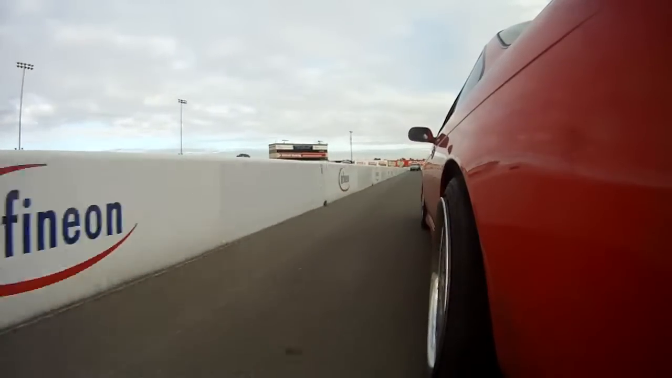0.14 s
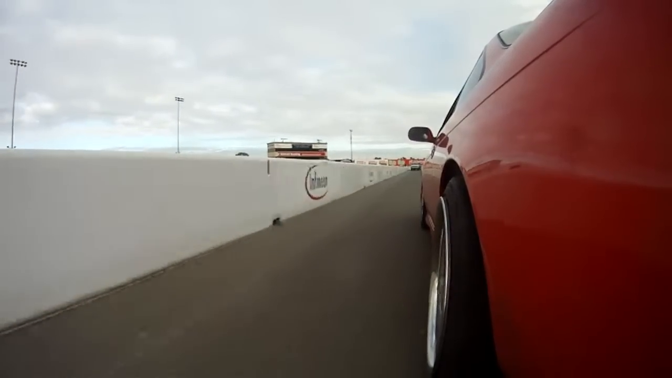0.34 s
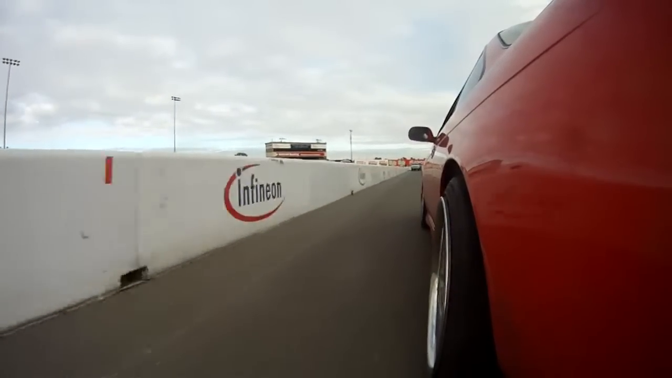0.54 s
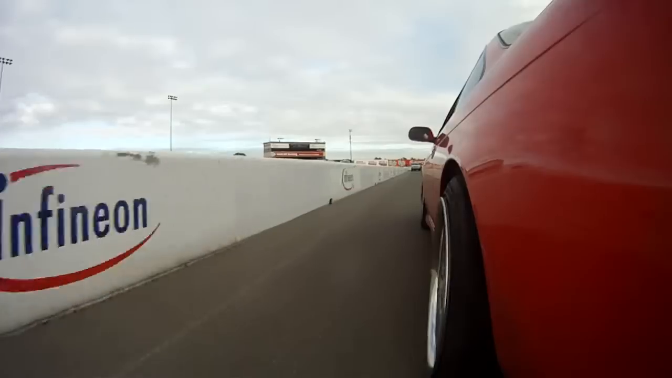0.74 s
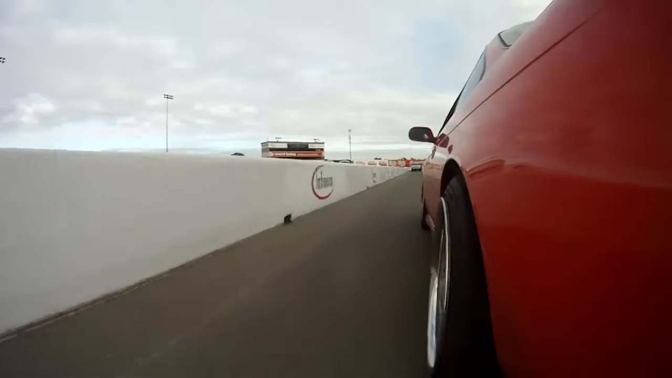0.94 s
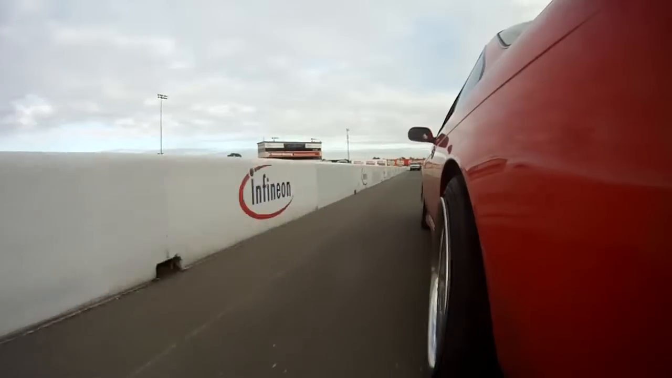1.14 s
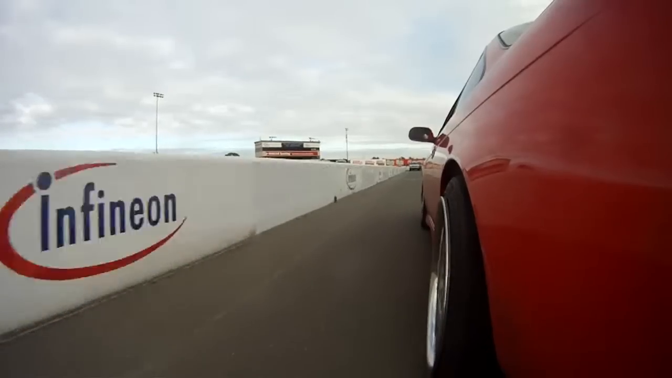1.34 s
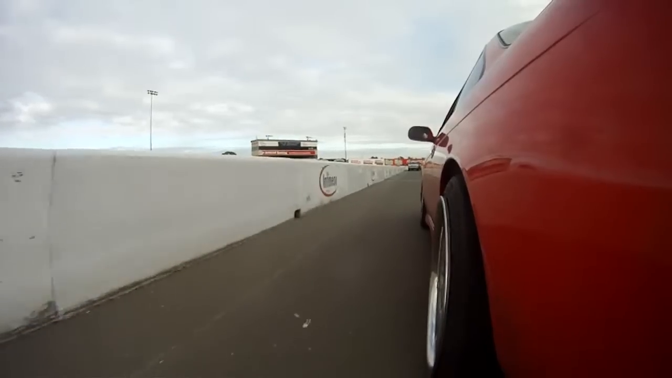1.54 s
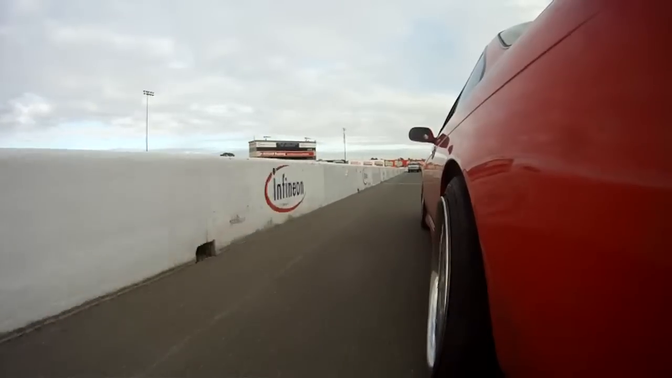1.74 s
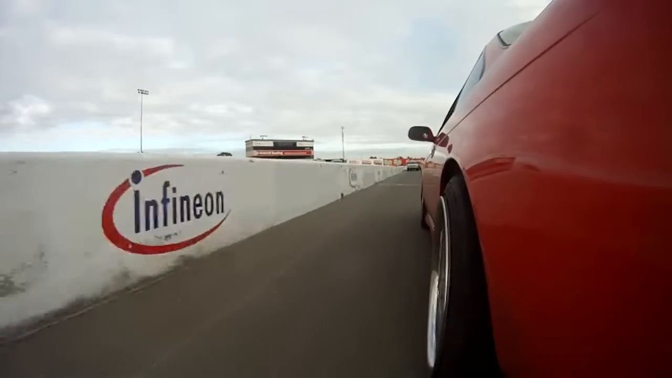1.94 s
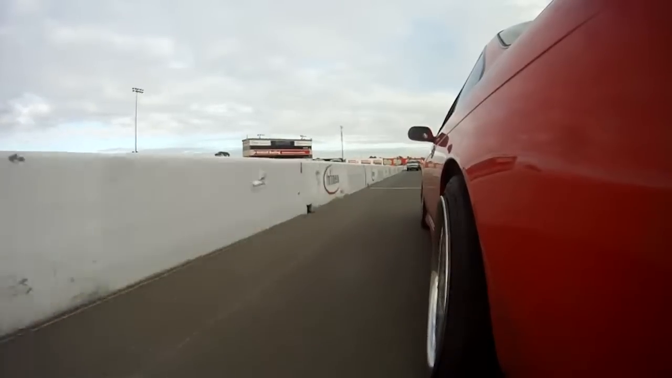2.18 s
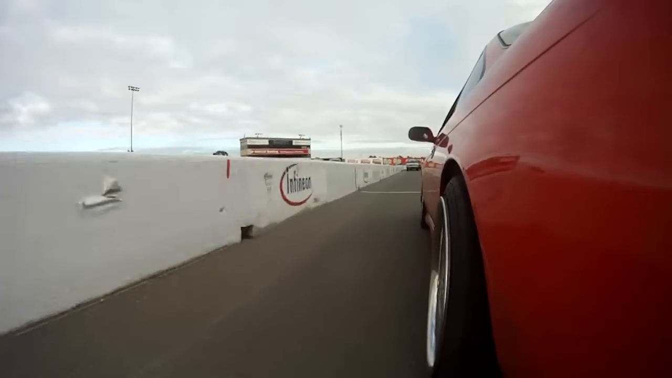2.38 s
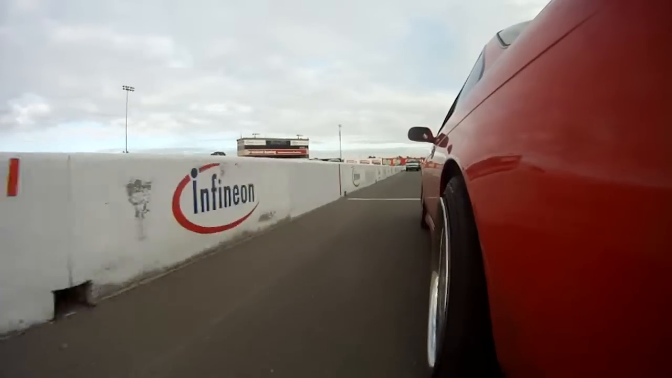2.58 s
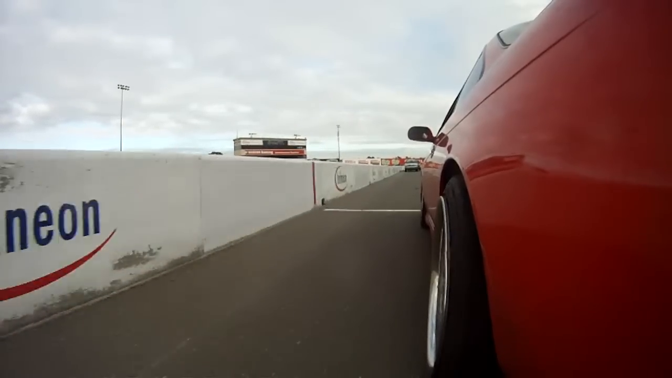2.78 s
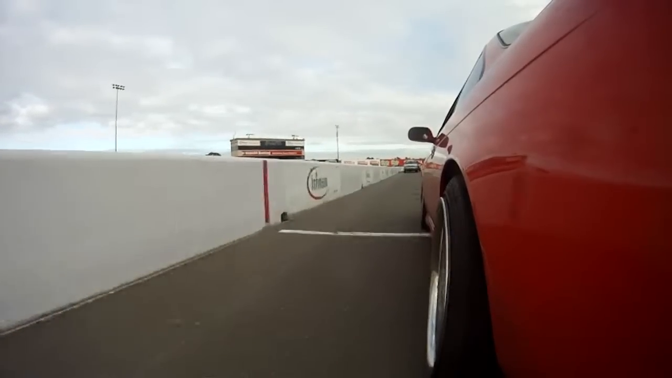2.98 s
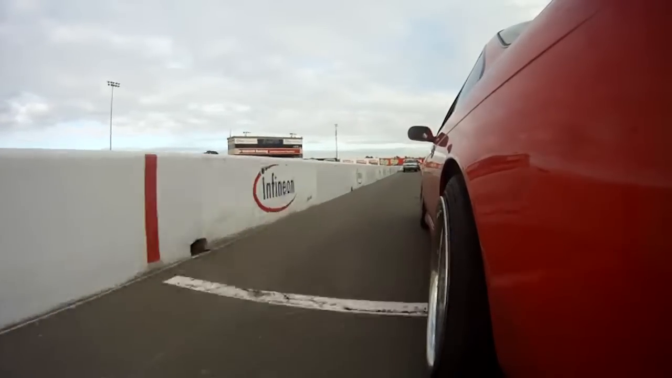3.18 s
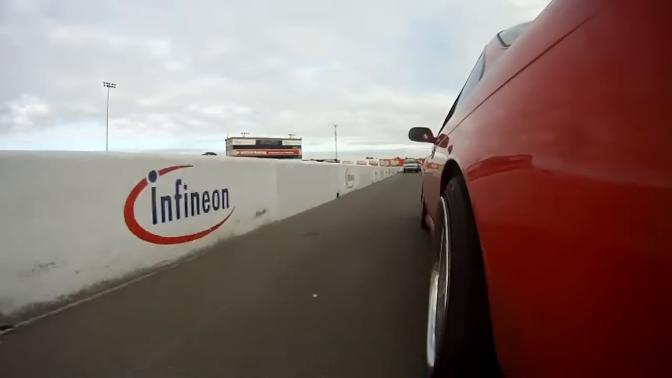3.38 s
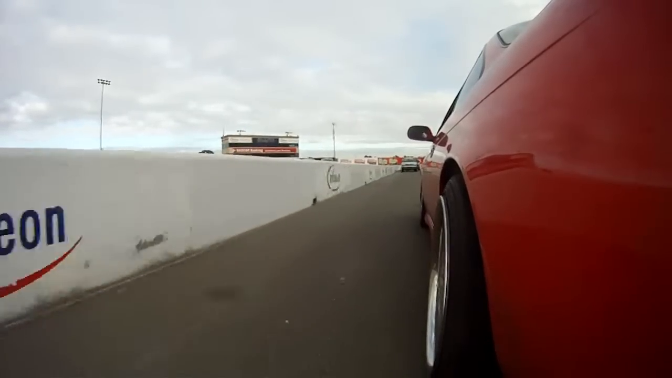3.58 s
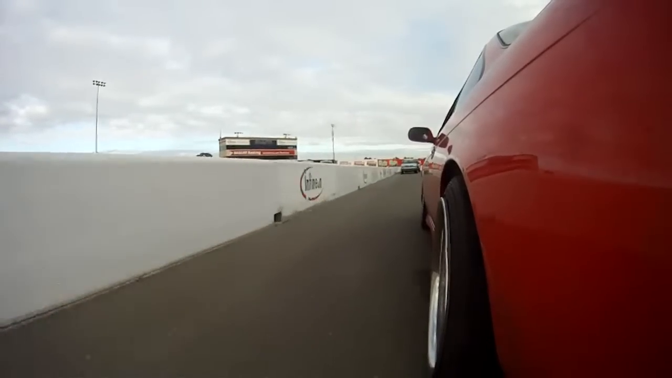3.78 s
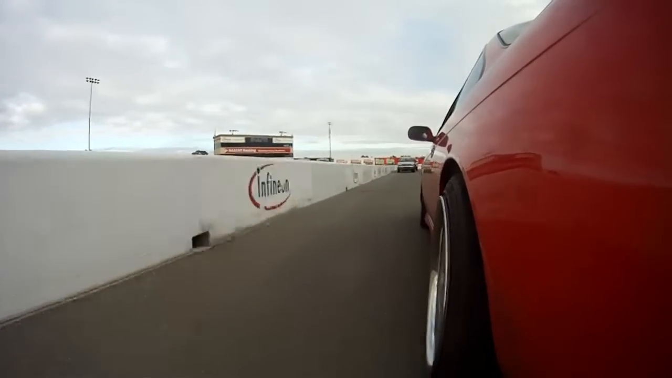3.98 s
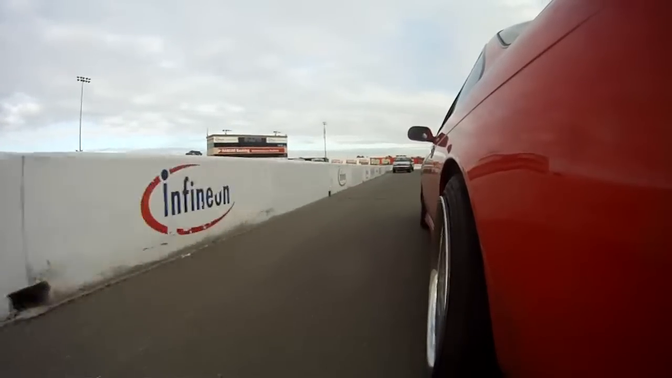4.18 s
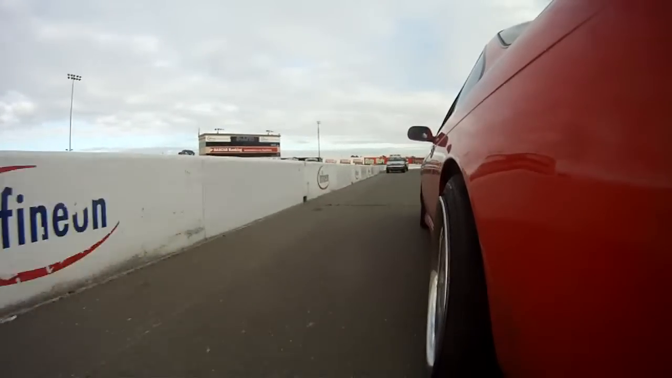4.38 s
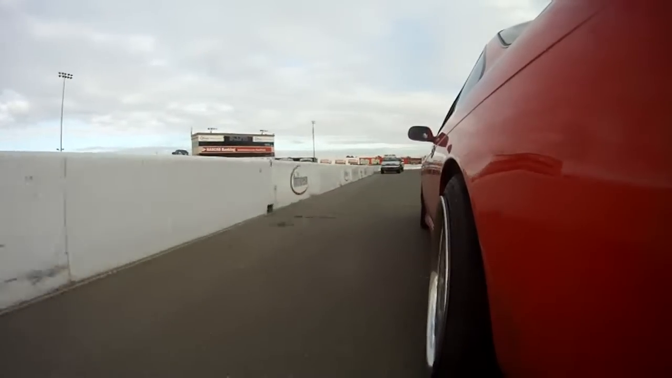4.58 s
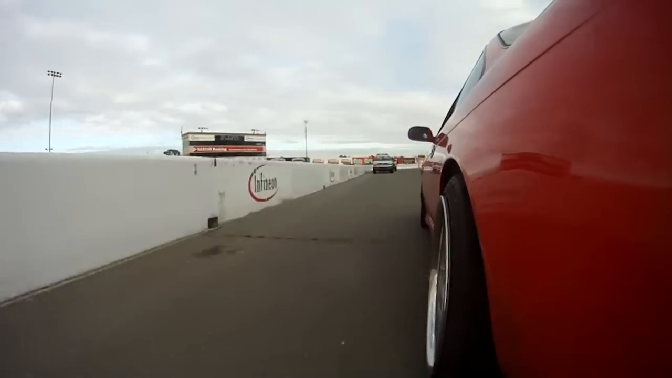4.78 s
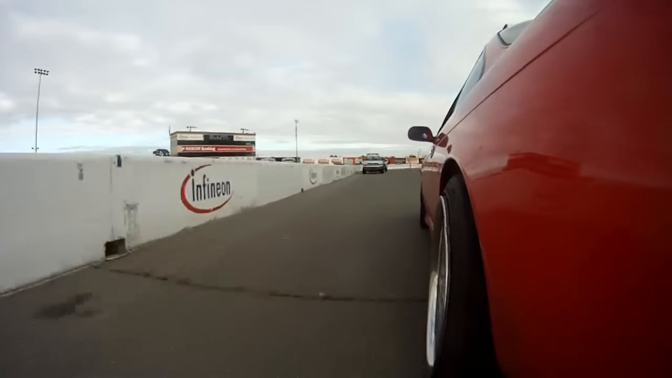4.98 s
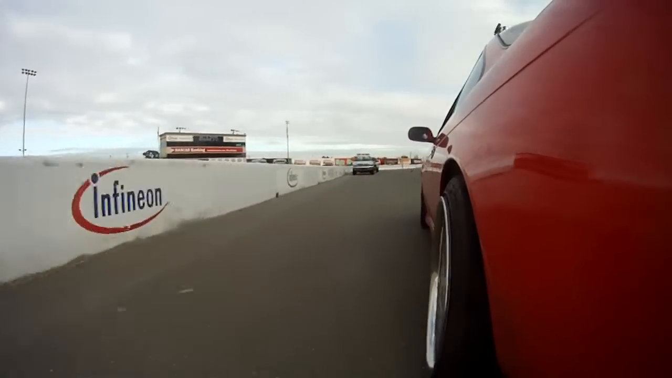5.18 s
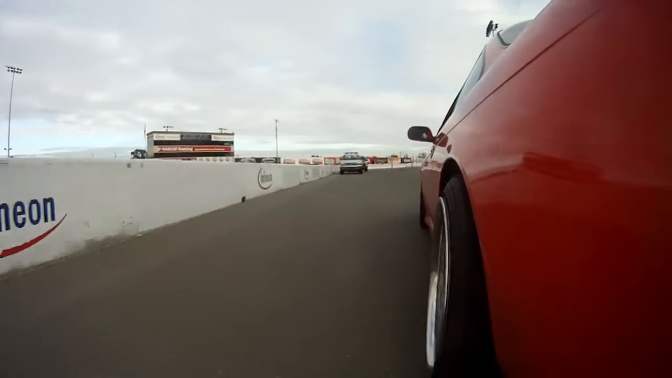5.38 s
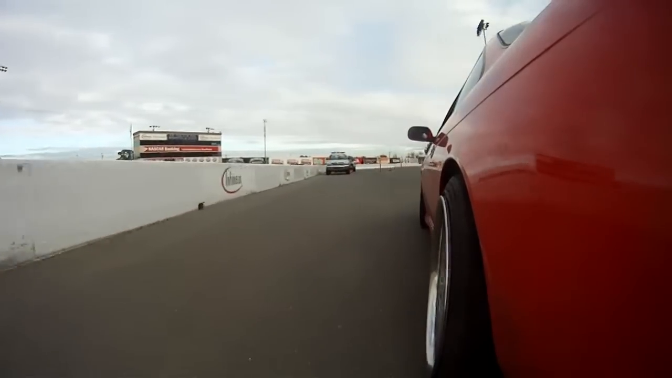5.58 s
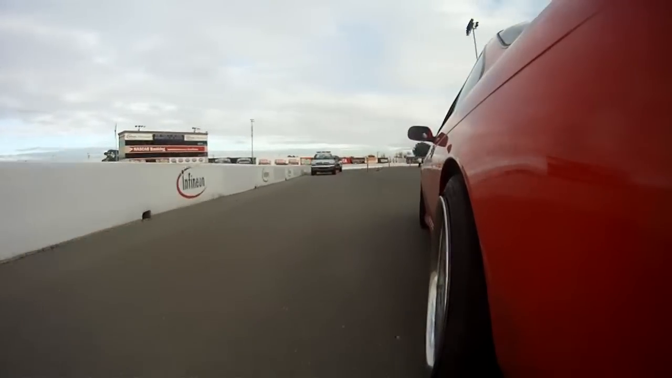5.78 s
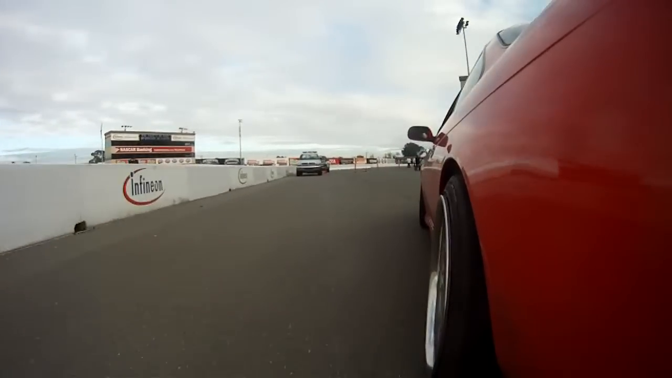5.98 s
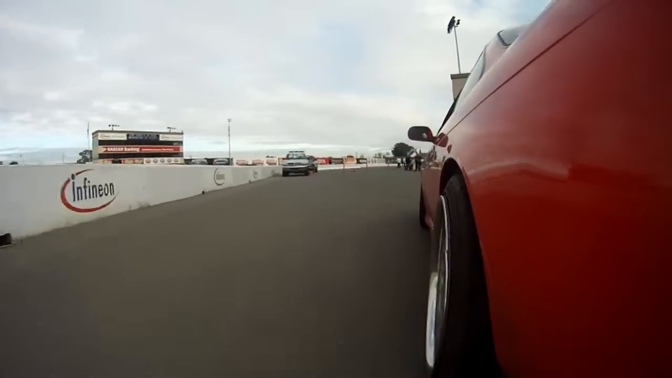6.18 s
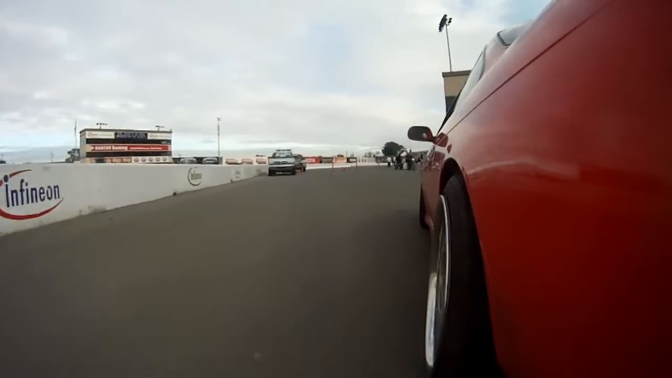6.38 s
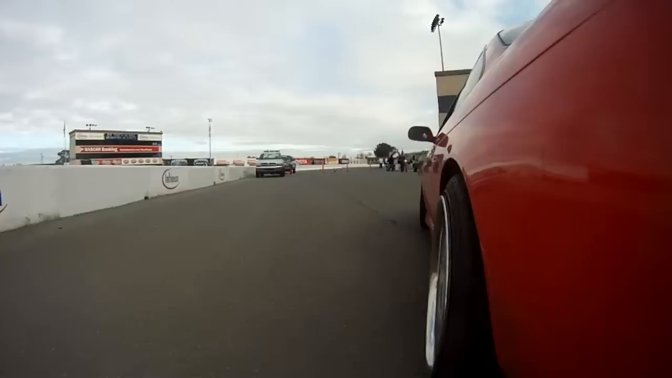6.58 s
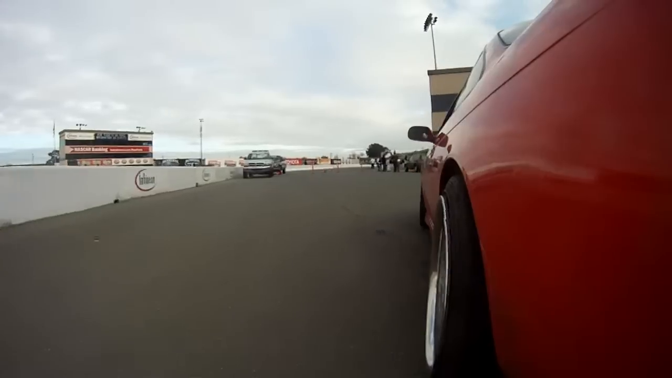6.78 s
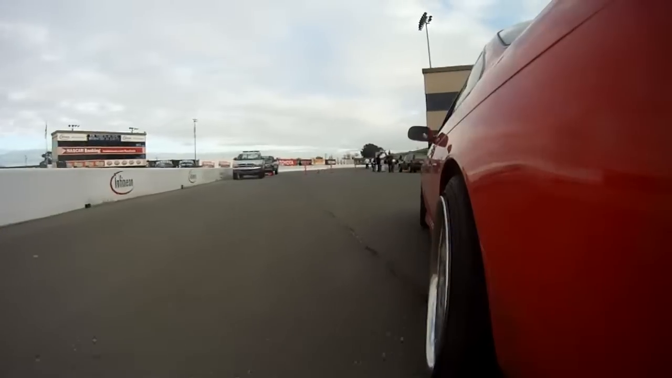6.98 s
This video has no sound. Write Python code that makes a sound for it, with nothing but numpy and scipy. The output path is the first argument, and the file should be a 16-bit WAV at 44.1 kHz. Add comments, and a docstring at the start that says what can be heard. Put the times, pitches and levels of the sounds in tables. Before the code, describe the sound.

A low thump at the very start leads into the drone of a four-cylinder sports car, heard from low on its side behind the front wheel. Deep wind and wheel rumble run throughout, with tyre roar and a thin, bright hiss on asphalt. The drone sags slightly, then from about 1.3 to 2 seconds falls sharply in pitch and level. The engine picks up a little by 3 seconds and throbs on lightly. Small flicks of grit are scattered throughout, and a stone pings off the wheel near 1.9 seconds, with a softer one at 6.5. At about 3.4 seconds a bump rings a body panel with a short low note; lighter bumps and a scuff follow just after 4. From 3 seconds a faint second engine hums, coming and going. The road noise gradually eases as the car slows, up to 7 seconds.

```python
"""The drone of a four-cylinder sports car opens with a brief, loud low swell, with the rumble of wheel and wind
shaking a camera mounted low behind its front wheel. The tyre hisses on asphalt and flicks up grit as the car
slows along a pit wall. The drone drops when the clutch opens, then the engine runs on lightly. Stones ping off
the wheel, a second engine hums nearby and bumps ring a body panel. The camera holds each sample of the sound at
12 kHz, which adds a thin, bright edge."""
import sys
import numpy as np
from scipy import signal
from scipy.fft import rfft, irfft, next_fast_len
from scipy.io import wavfile
from scipy.ndimage import uniform_filter1d

SR = 44100
rng = np.random.default_rng(int(sys.argv[2]) if len(sys.argv) > 2 else 0)


def digitize_waveform(pressure):
    """Quantize a signal to 16-bit integers and store it at the path in sys.argv[1].

    Rows of a 2-D input are taken as channels; values are limited to [-1, 1].
    """
    field = np.atleast_2d(pressure).T
    bounded = np.clip(field, -1, 1)
    quanta = np.round(bounded * 32767).astype(np.int16)
    wavfile.write(sys.argv[1], SR, quanta)


N = 310023
T = np.arange(N) / SR


def from_db(db):
    """Turn decibels into a number to multiply by."""
    return 10 ** (np.asarray(db) / 20)


def rms_one(x):
    """Scale x so that its average strength (rms) is 1."""
    return x / np.sqrt(np.mean(x ** 2) + 1e-20)


def in_time(rows):
    """Join a table's points with straight lines: one curve for each column after the time."""
    times, *columns = np.transpose(rows)
    return [np.interp(T, times, column) for column in columns]


def at_hz(points, hz):
    """Look up a table's level at any frequency, spacing the octaves evenly."""
    f, db = np.transpose(points)
    return np.interp(np.log(hz + 1e-3), np.log(f), db)


def drift(rate):
    """A smooth random wobble of strength 1 that changes about rate times a second."""
    pole = np.exp(-80 * np.pi * rate / SR)
    slow = signal.lfilter([1], [1, -2 * pole, pole * pole], rng.standard_normal(N // 40 + 2002))[2000:]
    return np.interp(np.arange(N) / 40, np.arange(len(slow)), rms_one(slow))


def coloured(x, db_at):
    """Shape the lows and highs of x by db_at(Hz), ringing only after each sound; strength 1."""
    size = 2 * next_fast_len(N // 2 + 1)
    hz = np.arange(size // 2 + 1) * SR / size
    cepstrum = irfft(np.log(from_db(db_at(hz))), size)
    response = np.exp(rfft(2 * cepstrum[:size // 2], size))
    return rms_one(irfft(rfft(x, size) * response, size)[:N])


def grains(per_s, spread_db):
    """Tiny random taps of uneven size; strength 1."""
    taps = (rng.random(N) < per_s / SR) * rng.choice([-1, 1], N)
    return rms_one(taps * from_db(spread_db * np.clip(rng.standard_normal(N), -2, 2)))


def spurts(per_s, decay_s):
    """Random surges that start at once and die away; centred on 0, strength 1."""
    starts = rng.random(N) < per_s / SR
    surges = signal.lfilter([1], [1, -np.exp(-1 / (decay_s * SR))], starts + 1e-18)
    return rms_one(surges - surges.mean())


def steadied(x, evenness):
    """Even out the swells of a vibration, as a damped mount does."""
    swell = uniform_filter1d(np.abs(signal.hilbert(x, next_fast_len(N))[:N]), size=1500)
    return rms_one(x / (swell + 0.2) ** evenness)


def hump(t, half_length, db):
    """A smooth rise and fall that peaks at time t."""
    return from_db(db) * np.exp(-((T - t) / half_length) ** 2)


def ring(t, half_length, db, hz):
    """A knock that swells into a brief tone and fades."""
    return np.sqrt(2) * hump(t, half_length, db) * np.sin(2 * np.pi * hz * (T - t))


# engine speed: sags in gear, falls as the clutch opens, then rises gently twice: t/s, turns per second
ENGINE_SPEED = [(0, 56), (.6, 54.15), (1.21, 52.7), (1.42, 45.2), (1.8, 30.3), (2, 27.3), (2.2, 29.8),
                (2.55, 32.8), (3.15, 34.6), (3.8, 33.3), (4.5, 32.2), (4.8, 30.9), (5.75, 29.1),
                (6.2, 29.6), (6.65, 31.1), (7.03, 31.1)]
# how loud the exhaust is: t/s, level/dB
EXHAUST_LEVEL = [(0, -24), (1.42, -24.5), (1.55, -29), (1.85, -32), (1.98, -44), (2.3, -38.5), (4.5, -38.5),
                 (5.7, -41), (6.2, -37)]
# the opening clutch blends the in-gear sound into the light-running one: t/s, light share (0-1)
LIGHT_SHARE = [(1.25, 0.44), (1.85, 0.82)]
# the engine's tones: multiple of engine speed, level in gear/dB, level running light/dB
ENGINE_TONES = [(1, -34, 8.5), (2, 8, -9), (3, -16.5, 1), (4, -15.5, 2), (5, -8, -2.5), (6, -31.5, -0.5),
                (7, -27.5, 3.5), (8, -7.5, -19.5), (9, -28, -11.5), (10, -7, -28), (13, -11, -21.5)]
# the throttle lifts the higher tones: t/s, level/dB
THROTTLE_BITE = [(0, 0.5), (.8, 2), (1.3, -1), (1.55, -3.5), (2.5, -6), (3.1, 5.5), (4.5, -2.5),
                 (4.95, 5.5), (7.03, -2)]
# the path from exhaust to camera, with a panel that rings near 211 Hz: f/Hz, level/dB
EXHAUST_PATH = [(64, -3.5), (73, 6.5), (90, -1), (110, 1.5), (135, 2.5), (150, 0.5), (163, 3), (173, -4.5),
                (190, 0.5), (211, 4.5), (227, -15), (265, -2.5), (282, -8.5), (320, -31), (450, -21.5),
                (800, -16)]
# gas rushing through the exhaust: f/Hz, level/dB
GAS_RUSH = [(80, -23), (150, -5), (240, 3), (300, -5.5), (400, -10), (500, -19), (720, -12), (850, -13.5),
            (1200, -14), (1600, -14.5), (3000, -37)]


def engine(jitter=0.0031, rough_gear=0.029, rough_light=0.065, tone_wobble=0.091, smear=0.1695,
           rush_db=-15.5, throb=0.34):
    """In gear, two firings a turn make a drone; running light, the tones join in one throb a turn."""
    speed, = in_time(ENGINE_SPEED)
    level_db, = in_time(EXHAUST_LEVEL)
    bite_db, = in_time(THROTTLE_BITE)
    light, = in_time(LIGHT_SHARE)
    turns = np.cumsum(speed * (1 + jitter * drift(24.3))) / SR
    # every turn fires with a strength of its own
    count = int(turns[-1]) + 2
    strength = np.interp(turns, np.arange(count), rng.standard_normal(count))
    uneven = 1 + (rough_gear + light * (rough_light - rough_gear)) * strength
    tones = np.zeros(N)
    for multiple, gear_db, light_db in ENGINE_TONES:
        multiple = np.round(multiple)
        bite_share = np.clip((multiple - 4) / 3, 0, 1)
        tone_db = gear_db + light * (light_db - gear_db) + bite_share * bite_db
        gain = from_db(tone_db + at_hz(EXHAUST_PATH, multiple * speed))
        wobble = 1 + tone_wobble * (multiple - 1) / 2 * drift(11.0)
        # the pipe delays high tones a little, which smears each pulse
        phase = 2 * np.pi * multiple * turns - smear * multiple ** 2
        tones -= np.sqrt(2) * gain * wobble * np.cos(phase)
    # gas puffs out at each firing
    puffs = rng.standard_normal(N) * (1 + throb * np.cos(4 * np.pi * turns))
    rush = coloured(puffs, lambda hz: at_hz(GAS_RUSH, hz))
    return from_db(level_db) * uneven * (tones + from_db(rush_db) * rush)


# the front wheel, as the car brakes gently: t/s, turns per second
WHEEL_SPEED = [(0, 17.4), (1.5, 15.2), (3.1, 12.63), (5.1, 9.77), (5.9, 9.3), (7.03, 8)]
# the wheel's vibrations: multiple of wheel speed, level/dB
WHEEL_TONES = [(3, 1), (4, 6.5), (5, -4), (6, 2)]
# how easily the camera mount sways: f/Hz, level/dB
MOUNT_RESPONSE = [(15, -15), (25, -9), (33, 0.5), (46, 6), (56, -4), (68, -15.5), (100, -18.5),
                  (200, -53.5)]
# the swaying between swells: t/s, level/dB
SWAY_LEVEL = [(0, -27), (1.4, -26.5), (1.8, -29), (3.1, -27), (3.5, -30.5), (5.1, -30), (5.6, -35.5),
              (6.1, -31.5), (7.03, -33.5)]
# swells of the low rumble, the loudest right at the start: t/s, level/dB
RUMBLE_SWELLS = [(.03, -13), (.8, -24), (2.3, -24), (2.42, -26), (3.06, -23), (3.3, -20), (3.83, -24),
                 (4.101, -22.5), (4.33, -23.5), (4.59, -25), (5.14, -27), (6.04, -29), (6.19, -30)]
# the steady wind: f/Hz, level/dB
WIND_RUMBLE = [(6, 9), (13, 13.5), (19, -5), (30, 4), (48, 4), (65, -19), (150, -46.5)]


def wheel_and_wind(air_db=-5.5, wind_db=-44.0, wander=0.019, swell_s=0.034):
    """The turning wheel and the air shake the mount: a low rumble with brief swells, over steady wind."""
    speed, = in_time(WHEEL_SPEED)
    level_db, = in_time(SWAY_LEVEL)
    turns = np.cumsum(speed * (1 + wander * drift(15.4))) / SR
    shake = np.zeros(N)
    for multiple, db in WHEEL_TONES:
        gain = from_db(db + at_hz(MOUNT_RESPONSE, multiple * speed))
        shake += gain * np.sin(2 * np.pi * (np.round(multiple) * turns + rng.random()))
    air = coloured(rng.standard_normal(N), lambda hz: at_hz(MOUNT_RESPONSE, hz))
    sway = steadied(rms_one(shake) + from_db(air_db) * air, evenness=0.38)
    swells = sum(hump(t, swell_s, db) for t, db in RUMBLE_SWELLS)
    wind = coloured(rng.standard_normal(N), lambda hz: at_hz(WIND_RUMBLE, hz))
    return np.hypot(from_db(level_db), swells) * sway + from_db(wind_db) * wind


def speed_halvings():
    """How many times the car's speed has halved; each halving takes some dB off the road noises."""
    speed, = in_time(WHEEL_SPEED)
    return np.log2(speed[0] / speed)


# road rumble in the car's body: f/Hz, level/dB
BODY_RUMBLE = [(50, -2.5), (80, -1), (140, -4), (185, 3), (212, 5), (240, -1), (272, -4), (295, -10),
               (350, -20), (450, -24), (600, -25.5), (900, -46.5)]


def road_rumble(start_db=-34.0, loss_db=3):
    """Small jolts from the road thud in the car's body."""
    jolts = grains(400, spread_db=4.5)
    thuds = coloured(jolts, lambda hz: at_hz(BODY_RUMBLE, hz))
    return from_db(start_db - loss_db * speed_halvings()) * steadied(thuds, evenness=0.85)


# pitches at which the camera's case rings: f/Hz, width/Hz, level/dB
CASE_PEAKS = [(420, 25, 3), (715, 40, 5), (905, 95, 4.5), (1040, 150, 4.5), (1172, 75, 12), (1335, 70, 7),
              (1520, 110, 8), (2070, 110, 10), (2155, 90, 9), (2360, 150, 6.5), (2580, 150, 6),
              (3110, 160, 8), (3280, 50, 6), (3525, 45, 5), (3670, 55, 4), (3950, 80, 6), (5050, 240, 8)]


def case_db(hz):
    """The plastic case boosts tyre and grit sounds near the pitches at which it rings."""
    return sum(db / (1 + (2 * (hz - centre) / width) ** 2) for centre, width, db in CASE_PEAKS)


# the tyre's roar: f/Hz, level/dB
TYRE_ROAR = [(250, -18.5), (350, 3), (500, -6), (750, -3.5), (1000, 1.5), (1400, -6), (1800, -9.5),
             (2500, -23)]
# the tyre's hiss: f/Hz, level/dB
TYRE_HISS = [(900, -33), (1500, -9.5), (1800, -8), (2150, 0), (2450, -0.5), (2850, -7), (3300, -4.5),
             (4100, -6), (4550, -15), (5250, -11), (5900, -17)]
# the wall's effect on the tyre noise holds steady, then fades as the wall falls away: t/s, level/dB
WALL_FADE = [(4.3, 1), (5.6, 1.13), (7.03, -3)]


def tyre(roar_base_db=-43.5, roar_loss_db=8, hiss_base_db=-40.5, hiss_loss_db=9.5,
         flutter_db=0.44, patchy_db=0.3, brightening=0.18):
    """Blocks of tread slap the asphalt (roar) and peel off it (hiss), surging with its rough surface."""
    wall_db, = in_time(WALL_FADE)
    roar_db = roar_base_db + wall_db - roar_loss_db * speed_halvings()
    hiss_db = hiss_base_db + wall_db - hiss_loss_db * speed_halvings()
    flutter = flutter_db * spurts(150, decay_s=0.018)
    slaps = grains(1500, spread_db=2.0) + 0.93 * rng.standard_normal(N)
    slaps *= from_db(flutter + patchy_db * spurts(100, decay_s=0.0057))
    peels = grains(2000, spread_db=1.0) + 1.19 * rng.standard_normal(N)
    peels *= from_db(flutter + patchy_db * spurts(74, decay_s=0.016))
    roar = coloured(slaps, lambda hz: at_hz(TYRE_ROAR, hz) + case_db(hz))
    hiss = coloured(peels, lambda hz: at_hz(TYRE_HISS, hz) + case_db(hz))
    # the hiss dulls as the car slows
    treble = signal.sosfiltfilt(signal.butter(2, 4000, "high", fs=SR, output="sos"), hiss)
    treble_db = brightening * (hiss_db - hiss_db.mean())
    hiss += (from_db(treble_db) - 1) * treble
    return from_db(roar_db) * roar + from_db(hiss_db) * hiss


# grit and scuffs: t/s, half-length/s, level/dB, f/Hz, width/octaves
GRIT_SPRAYS = [(0.173, 0.01, -35.5, 2150, 0.32), (0.28, 0.006, -38, 2100, 0.3),
               (0.585, 0.0075, -37, 2020, 0.41), (0.98, 0.021, -38, 1180, 0.11),
               (1.22, 0.012, -42.5, 1190, 0.1), (1.637, 0.0096, -39, 2100, 0.3),
               (1.85, 0.002, -30.5, 1110, 1.2), (3.351, 0.057, -46, 960, 0.34),
               (4.303, 0.029, -35, 860, 0.53), (4.293, 0.021, -38, 330, 0.25),
               (4.357, 0.011, -41, 2200, 0.24), (4.461, 0.24, -49, 1010, 0.11),
               (5.228, 0.02, -45, 1440, 0.5), (6.502, 0.0096, -37, 1700, 0.77),
               (6.52, 0.0096, -49, 2000, 0.58)]


def grit():
    """The tyre scuffs and flicks up grit: short bursts of noise, heard through the camera's case."""
    sprays = np.zeros(N)
    for t, half_length, db, centre, octaves in GRIT_SPRAYS:
        band_db = lambda hz: -20 * np.log10(1 + (np.log2((hz + 1) / centre) / octaves) ** 2)
        noise = coloured(rng.standard_normal(N), lambda hz: band_db(hz) + case_db(hz))
        sprays += hump(t, half_length, db) * noise
    return sprays


# stones hitting the wheel: t/s, half-length/s, level/dB, f/Hz
STONE_HITS = [(1.851, 0.0013, -21.5, 2260), (6.503, 0.0073, -37, 1160), (6.505, 0.0033, -52, 2130)]


def stones():
    """Stones bounce off the wheel with tiny, high pings."""
    return sum(ring(*hit) for hit in STONE_HITS)


# the second engine's firing rate and loudness: t/s, f/Hz, level/dB
SECOND_ENGINE = [(2.5, 100.3, -63), (3.0, 103.4, -46.5), (4.1, 106, -54), (5.0, 109, -42.5),
                 (5.4, 108.4, -53.5), (5.95, 102.9, -47), (6.3, 108.5, -48.5), (7.03, 111.7, -55.5)]
# its tones: multiple of the firing rate, level/dB
SECOND_TONES = [(2, 1), (3, -15.5), (4, -9.5), (5, -16), (6, -21.5)]


def second_engine(waver_db=3.5, wander=0.00647):
    """The firing of a fainter engine makes a hum whose tones come and go along the wall."""
    firing_hz, level_db = in_time(SECOND_ENGINE)
    cycles = np.cumsum(firing_hz * (1 + wander * drift(5.92))) / SR
    hum = np.zeros(N)
    for multiple, db in SECOND_TONES:
        gain = from_db(level_db + db + waver_db * drift(3.1))
        hum += gain * np.sin(2 * np.pi * (np.round(multiple) * cycles + rng.random()))
    return np.sqrt(2) * hum


# bumps in the road: t/s, half-length/s, level/dB, f/Hz
ROAD_BUMPS = [(3.385, 0.028, -24, 211), (4.07, 0.012, -35.5, 297), (4.297, 0.021, -39.5, 316)]


def bumps():
    """Each bump makes the panel over the wheel ring with a short, low note."""
    return sum(ring(*bump) for bump in ROAD_BUMPS)


def scene():
    """Everything reaches the one microphone on the car's side."""
    mix = engine() + wheel_and_wind() + road_rumble() + tyre()
    mix += grit() + stones() + second_engine() + bumps()
    return mix[None]


def record(dry, hold_hz=12000, cutoff_hz=15400):
    """The camera holds each sample until the next, mirroring the sound around 12 kHz; the top is cut."""
    band = signal.sosfiltfilt(signal.butter(10, 5750, fs=SR, output="sos"), dry)
    samples = signal.resample_poly(band, hold_hz, SR, axis=1, window=("kaiser", 3))
    held = np.repeat(samples, 16, axis=1)
    stepped = signal.resample_poly(held, SR, 16 * hold_hz, axis=1)[:, :N]
    return signal.sosfilt(signal.ellip(12, .2, 80, cutoff_hz, fs=SR, output="sos"), stepped)


dry = scene()
out = record(dry)
digitize_waveform(out)
```